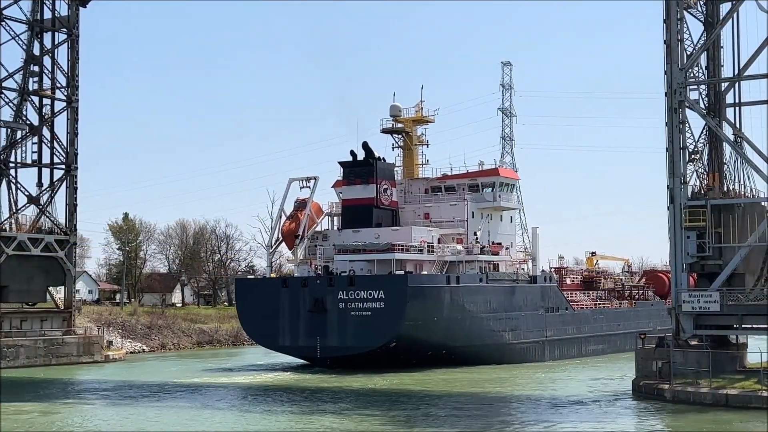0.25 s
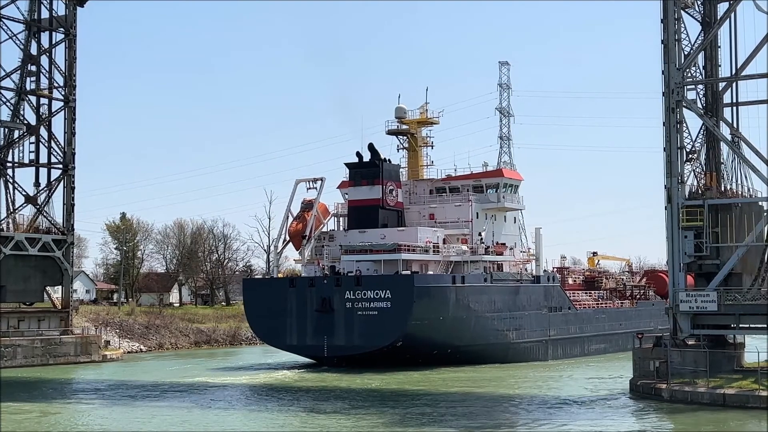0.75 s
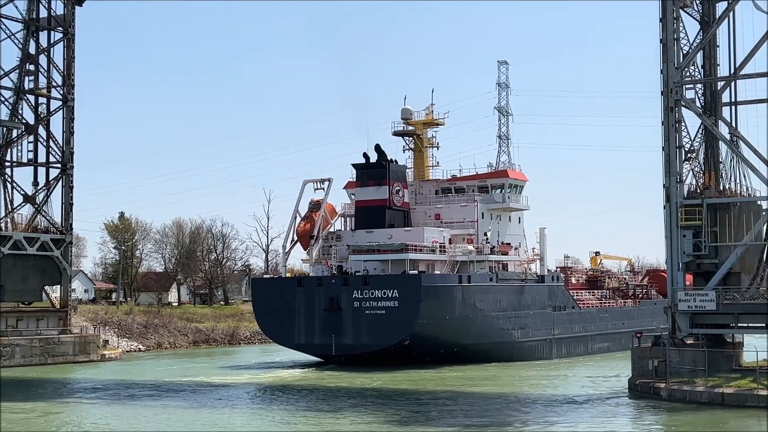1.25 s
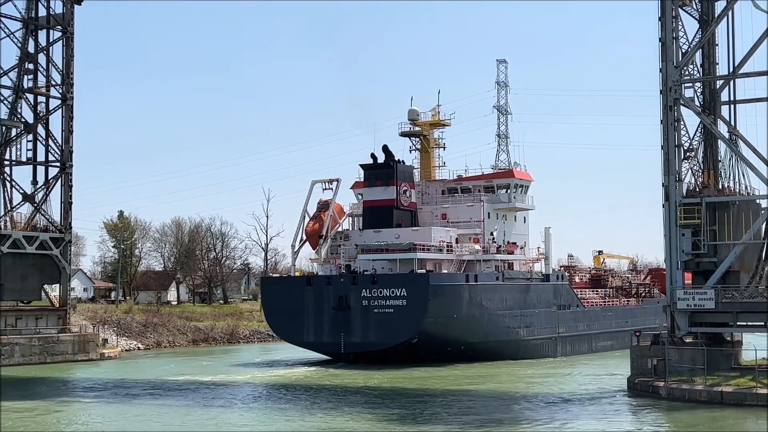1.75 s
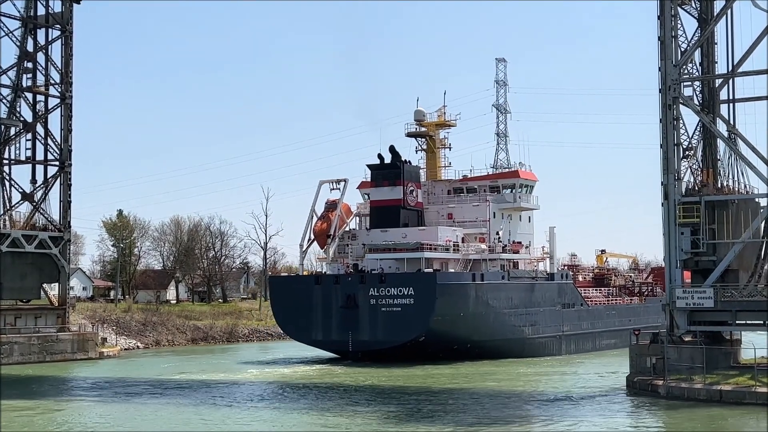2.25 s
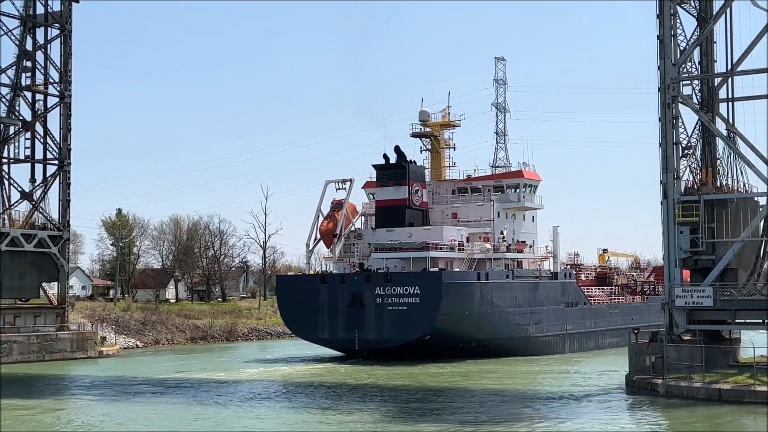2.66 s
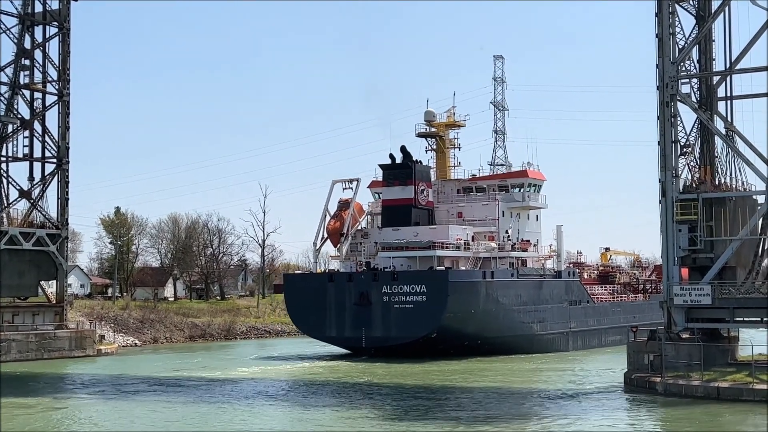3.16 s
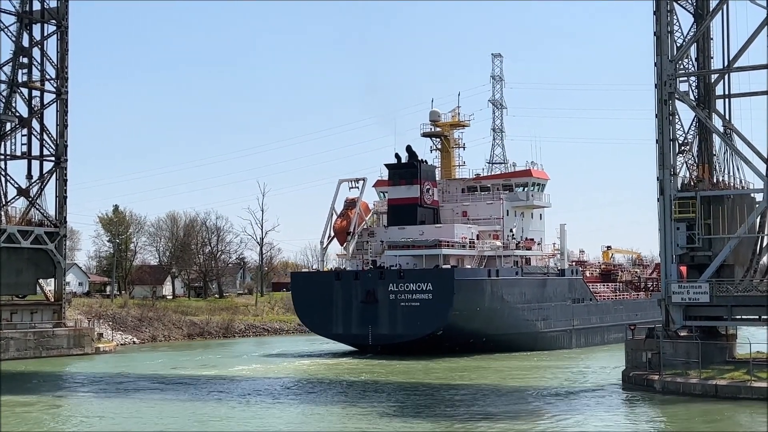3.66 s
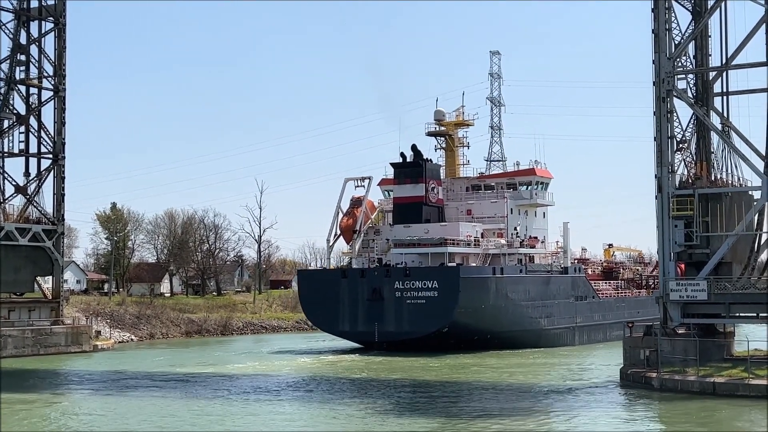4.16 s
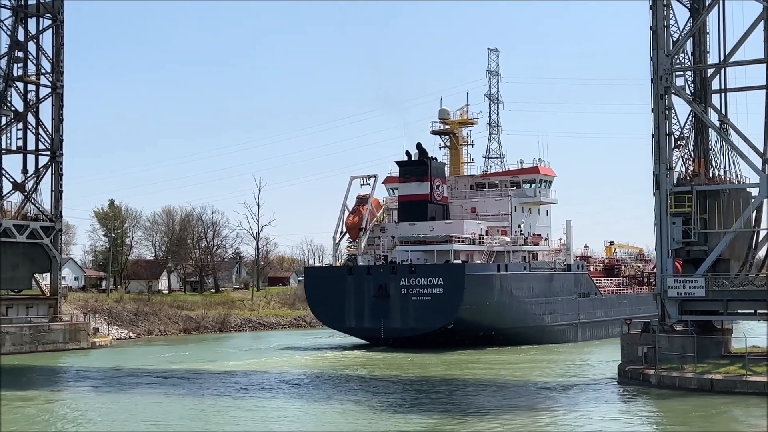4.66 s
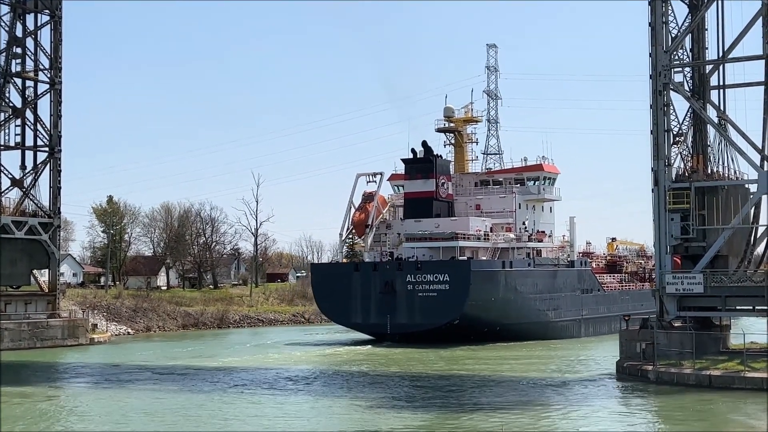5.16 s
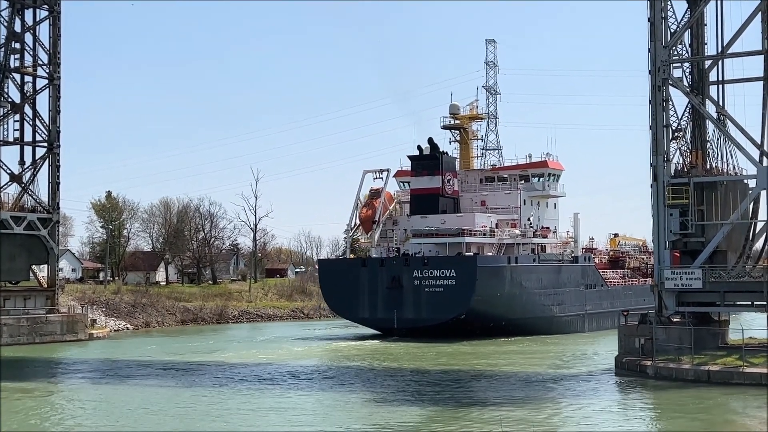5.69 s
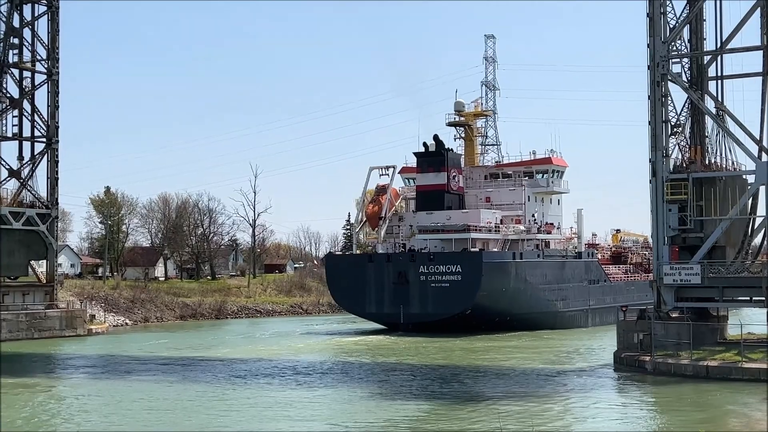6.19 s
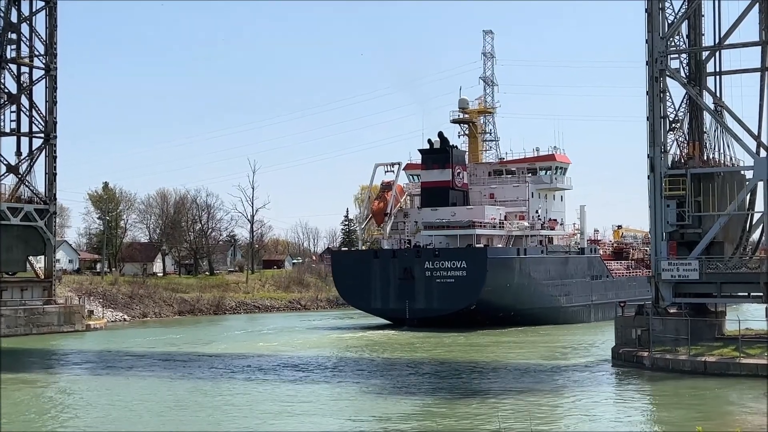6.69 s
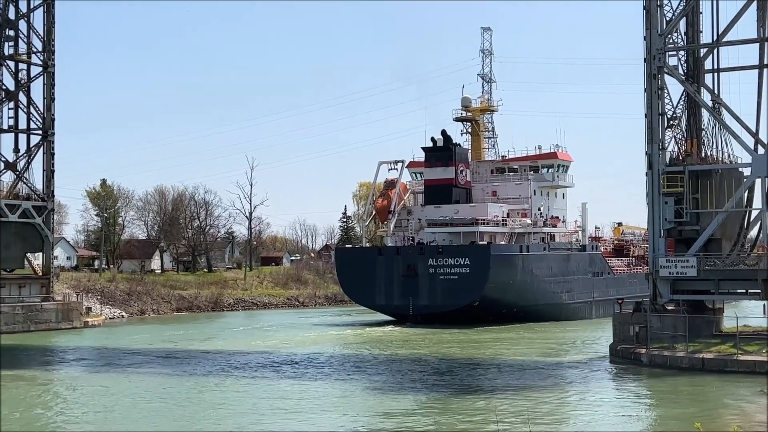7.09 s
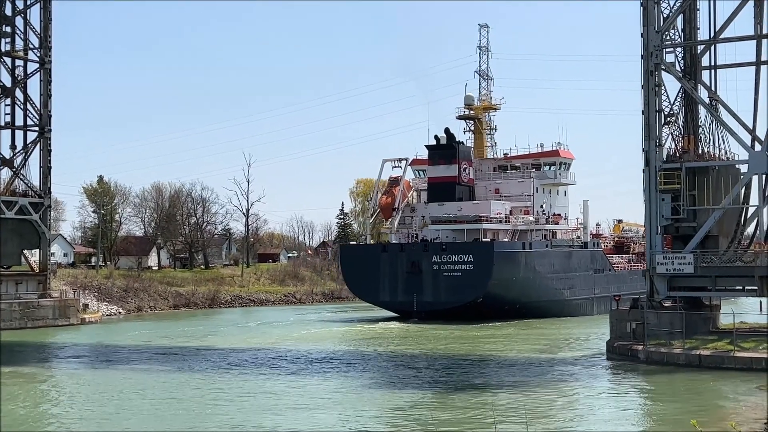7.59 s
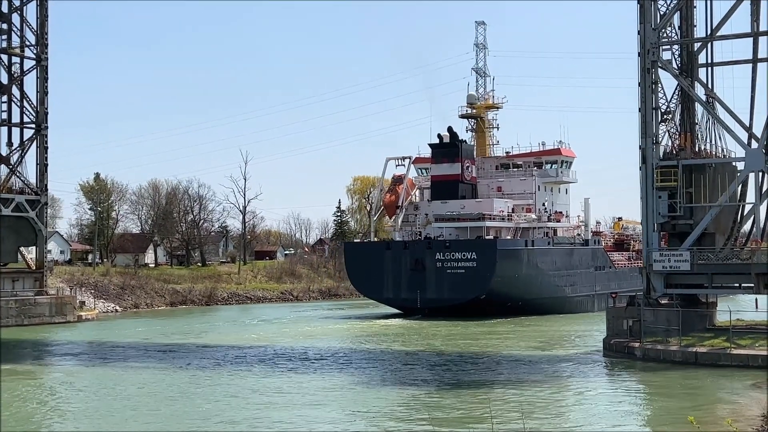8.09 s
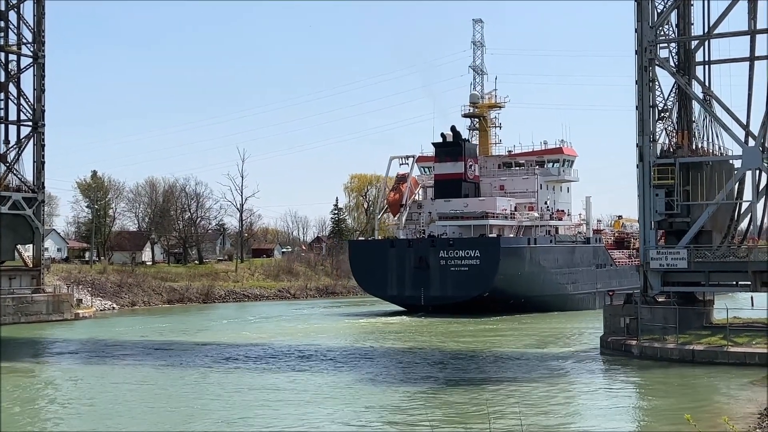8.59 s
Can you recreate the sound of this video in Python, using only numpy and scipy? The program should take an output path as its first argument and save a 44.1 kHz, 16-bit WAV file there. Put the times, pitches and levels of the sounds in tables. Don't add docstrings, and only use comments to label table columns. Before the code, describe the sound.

Throughout about 8.8 seconds, a large ship's slow diesel drones from across a canal, already running at the start and continuing to the end. Deep steady tones near 50 and 75 hertz waver gently, dipping briefly around 3.5 to 4.2 seconds; constant generator and pump hums sit around 120 to 200 hertz. Soft low exhaust turbulence starts weaker, swells over the first three seconds and keeps gusting, strongest near 5.9, easing at 6.3. A broad, muffled fan roar slowly brightens, with faint hollow vent resonances shifting through it, more noticeable from 3 to 7. Very quiet high foam hiss rises slightly. Tiny water slaps begin around 4, with clearer ones near 6.4, 7.4, 7.7 and 8.4. Outdoor stereo from the bank: engine broad and slightly left, drifting minutely inward; wash arrives first at right. The drone cuts off at the end without fading away.

```python
import sys
import numpy as np
from scipy import signal
from scipy.fft import rfft, irfft, next_fast_len
from scipy.io import wavfile
from scipy.ndimage import uniform_filter1d, map_coordinates

SR = 44100
rng = np.random.default_rng(int(sys.argv[2]) if len(sys.argv) > 2 else 0)


def elevation(decibels):
    levels = np.asarray(decibels, float)
    return 10 ** (levels / 20)


def materialize(psi):
    bounded = np.clip(np.atleast_2d(psi).T, -1, 1)
    quanta = np.round(bounded * 32767).astype(np.int16)
    wavfile.write(sys.argv[1], SR, quanta)


N = 389844


def unit(x):
    return x / np.sqrt(np.mean(x ** 2) + 1e-20)


def along(points, hz):
    f, v = np.transpose(points)
    return np.interp(np.log(hz + 1), np.log(f + 1), v)


def curve(points):
    s, v = np.transpose(points)
    return np.interp(np.arange(N) / SR, s, v)


def wobble(rate):
    knots = rng.standard_normal(int(N * rate / SR) + 4)
    return map_coordinates(knots, [np.arange(N) * rate / SR])


def filtered(x, response):
    m = next_fast_len(N + 8192)
    return irfft(rfft(x, m) * response(np.fft.rfftfreq(m, 1 / SR)), m)[..., :N]


def patchy(patchy_db):
    z = signal.stft(rng.standard_normal((2, N)), nperseg=512)[2]
    field = rng.standard_normal(z.shape[1:])
    field = uniform_filter1d(field, size=8, axis=0)
    field = uniform_filter1d(field, size=12, axis=1)
    return signal.istft(z * elevation(patchy_db * unit(field)), nperseg=512)[1][:, :N]


def rush(spectrum, patchy_db):
    # pitch_hz, correlation
    likeness = [(60, 0.935), (300, 0.96), (600, 0.915), (1500, 0.875), (2600, .81), (4200, .7), (6000, 1)]

    def response(hz):
        turn = np.arccos(np.clip(along(likeness, hz), -1, 1)) / 2
        return elevation(along(spectrum, hz)) * [np.cos(turn), np.sin(turn)]

    mid, side = filtered(patchy(patchy_db), response)
    return unit(np.array([mid + side, mid - side]))


def tone(angle, db, flutter_db):
    drift = 0.3 * wobble(1.5) + np.outer([1, -1], 0.17 * wobble(6.8))
    return np.sqrt(2) * elevation(db + flutter_db * wobble(2.0)) * np.cos(angle + drift)


def wake():
    # time_s, level_db
    foam = [
        (0, -68.3),
        (3, -67.2),
        (4.2, -66.6),
        (6.2, -67),
        (6.8, -65.4),
        (8.84, -65.6),
    ]
    # start_s, level_db, extra_spray_db
    slaps = [(3.98, -67, 0), (4.29, -67, 0), (4.686, -66, -3), (5.413, -65, 2), (6.28, -64, -4),
             (6.44, -58.5, -8), (6.67, -65, 1), (6.864, -67, 2), (7.365, -62, 3), (7.698, -57, 4),
             (8.2, -65, 2), (8.354, -61, 2)]
    # pitch_hz, level_db (per Hz)
    wash = [(1500, -20), (2600, 2), (4000, 2.5), (5600, 3), (7200, 0), (9000, -3), (11000, -8.5),
            (13000, -12), (14300, -14.5), (15200, -21), (16500, -40)]
    port_lag_s, in_phase_hz = 2.45e-4, 6990
    slap_t60_s, slap_rise_s = .13, .0012
    foam_level = elevation(curve(foam) + 5 + .5 * wobble(9) + .5 * wobble(22))
    level = np.array([foam_level, foam_level])
    t = np.arange(SR // 4) / SR
    rise = 1 - np.exp(-t / slap_rise_s)
    for s, db, spray_db in slaps:
        decay = elevation(db + np.outer([0, 1], [spray_db]) - 60 * t / slap_t60_s)
        level[:, round(s * SR):][:, :len(t)] += decay * rise

    def lead(hz):
        return np.exp(1j * np.pi * port_lag_s * np.outer([-1, 1], hz - in_phase_hz))

    near, scattered = patchy(patchy_db=.5)
    direct = filtered(near, lead)
    direct = direct + elevation(-13) * np.array([scattered, -scattered])
    direct = direct + elevation(-18) * patchy(patchy_db=2.5)[0]
    hiss = unit(filtered(direct, lambda hz: elevation(along(wash, hz))))
    spray = filtered(hiss, lambda hz: 1 / (1 + (8500 / (hz + 1)) ** 6))
    return level[0] * (hiss - spray) + level[1] * spray


def auxiliaries():
    # pitch_hz, level_db (rms)
    hums = [
        (42.5, -39),
        (121.46, -39),
        (157.95, -41),
        (160.75, -45),
        (201.03, -46),
        (241.25, -52),
        (402.16, -50),
    ]
    t = np.arange(N) / SR
    return elevation(-0.1) * sum(tone(2 * np.pi * (hz * t + rng.uniform()), db, flutter_db=-1.5) for hz, db in hums)


def exhaust():
    # pitch_hz, level_db (per Hz)
    rumble = [(12, -34), (22, -24), (32, -12), (48, -2), (60, 2), (70, 2), (84, -1.5), (103, -3.5),
              (115, -6.5), (142, -7), (176, -10.5), (191, -7.5), (235, -16), (500, -40), (1500, -120)]
    # time_s, level_db
    gusts = [(0, -29.5), (.6, -25), (1.0, -26.5), (1.75, -23), (2.35, -24.5), (2.7, -22.5), (3.2, -23),
             (3.65, -22.5), (4.4, -22), (4.9, -22), (5.2, -24), (5.45, -21.5), (5.85, -20), (6.3, -24),
             (7.1, -21.5), (7.5, -23), (7.9, -23.5), (8.84, -22.5)]
    return elevation(curve(gusts) + 1.14) * rush(rumble, patchy_db=1.0)


def fans():
    # pitch_hz, level_db (per Hz)
    roar_spectrum = [(130, -15), (220, -4.5), (323, -4.5), (475, -5), (600, -8.5), (691, -6.5), (880, -13),
                     (982, -13), (1090, -16.5), (1250, -17.5), (2000, -24.5), (3050, -32), (5000, -42),
                     (7000, -56), (9500, -120)]
    level_db, bright_db_per_s, bright_hz = -30.5, 0.31, 620
    t = np.arange(N) / SR
    roar = elevation(level_db + 1.0 + 0.18 * wobble(6)) * rush(roar_spectrum, patchy_db=0.71)
    upper = filtered(roar, lambda hz: 1 / (1 + (bright_hz / (hz + 1)) ** 8))
    return roar + (elevation(bright_db_per_s * (t - t.mean())) - 1) * upper


def vents():
    # pitch_hz, level_db, centre_s, half_length_s
    louvres = [(290, -47, 6.5, 3), (385, -45, 4, 1), (485, -43, 3, 2.5), (680, -45, 4, 1.6),
               (765, -42.5, 6.2, 1.3), (700, -46, 7.8, 1.5), (970, -49, 6, 3), (1250, -52, 4.6, 1.2),
               (1550, -56, 4.5, 3), (1750, -55, 8.2, 1.2), (2350, -59, 8.4, .9)]
    sharp = .045
    skirt = [(-4, -120), (-2, -20), (-1, -5), (0, 0), (1, -5), (2, -20), (4, -120)]  # half-widths, dB
    t = np.arange(N) / SR
    total = 0
    for hz, db, s, wide_s in louvres:
        band = [(hz * (1 + k * sharp), skirt_db) for k, skirt_db in skirt]
        facing = np.exp(-((t - s) / wide_s) ** 2)
        total = total + elevation(db) * facing * rush(band, patchy_db=.5)
    return total


def diesel():
    # order, first_db (rms), drift_db_per_s, fade_s, fade_depth_db
    strong = [
        (11, -36, .9, 3.7, 6),
        (12, -26, -.3, 4.2, 4.5),
        (13, -39, 1.3, 8.7, 9),
        (18, -27.5, -.55, 3.45, 11),
    ]
    # order, level_db (rms)
    weak = [(6, -57), (7, -52), (8, -45), (9, -49), (16, -39), (17, -43), (20, -37), (21, -43), (25, -44),
            (28, -43), (31, -44), (32, -45), (40, -44)]
    cycle_hz, fade_half_s = 4.1703, .7
    t = np.arange(N) / SR
    below_db, twice_db, above_db, thrice_db = [
        db + drift * t - depth * np.exp(-((t - s) / fade_half_s) ** 2) for _, db, drift, s, depth in strong]
    cycle = 2 * np.pi * cycle_hz * t
    late = 1.37
    hum = tone(12 * cycle, twice_db + .8, flutter_db=.6)
    hum += tone(13 * cycle + late, above_db, flutter_db=.6)
    hum -= tone(11 * cycle - late, below_db, flutter_db=.6)
    hum -= tone(18 * cycle + late, thrice_db, flutter_db=.6)
    for k, db in weak:
        hum += tone(round(k) * cycle + rng.uniform(0, 2 * np.pi), db, flutter_db=3.5)
    return hum


def scene():
    # pitch_hz, left_over_right_db
    left_bias = [(60, 1.4), (100, 2.5), (180, 2), (300, 0.5), (450, 5), (620, 0.4), (890, 1), (1520, 1.5),
                 (2600, 2), (5000, 3.5)]
    # pitch_hz, left_lead_rad
    left_lead = [(340, 0), (600, -.15), (860, 0), (1810, 0), (2760, .3)]
    swing_db_per_s = -.04
    ship = diesel() + auxiliaries() + exhaust() + fans() + vents()
    halves = [.5, -.5]

    def ports(hz):
        gain = elevation(np.outer(halves, along(left_bias, hz)))
        return gain * np.exp(1j * np.outer(halves, along(left_lead, hz)))

    swing = elevation(np.outer(halves, swing_db_per_s * np.arange(N) / SR))
    return swing * filtered(ship, ports) + wake()


def roll_off(x):
    return signal.sosfilt(signal.butter(12, 15200, fs=SR, output="sos"), x)


def record(dry):
    edge = np.arange(N)[::-1] / (.002 * SR)
    fade = np.sin(np.pi / 2 * np.minimum(edge, 1)) ** 2
    return roll_off(dry * fade)


dry = scene()
out = record(dry)
materialize(out)
```